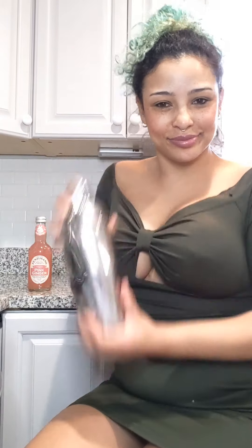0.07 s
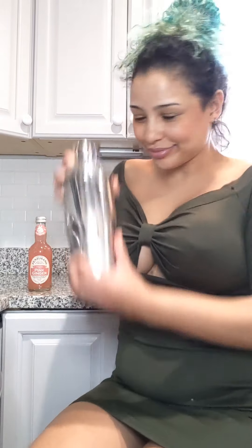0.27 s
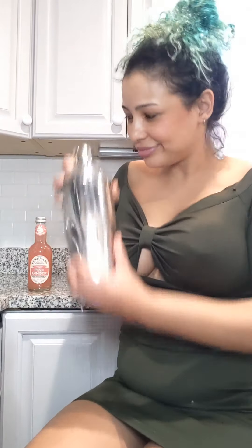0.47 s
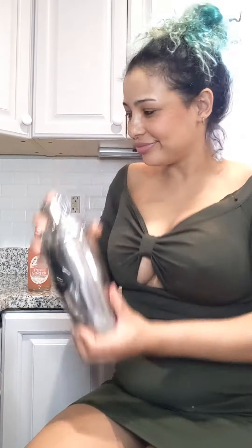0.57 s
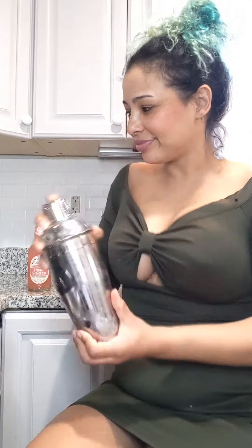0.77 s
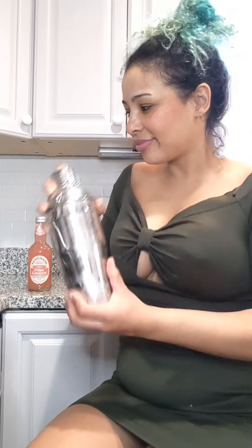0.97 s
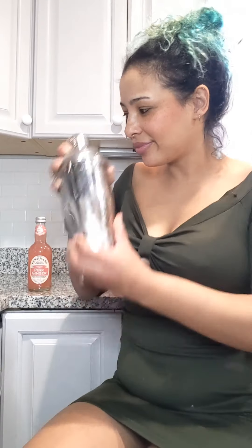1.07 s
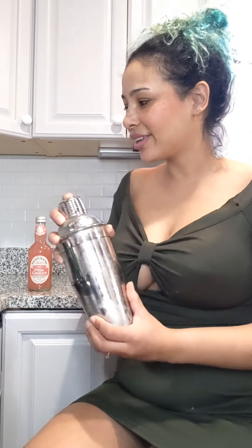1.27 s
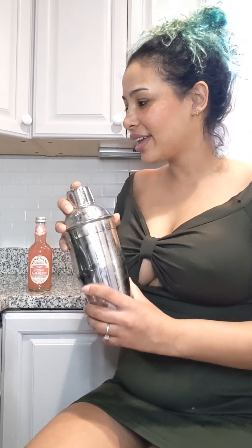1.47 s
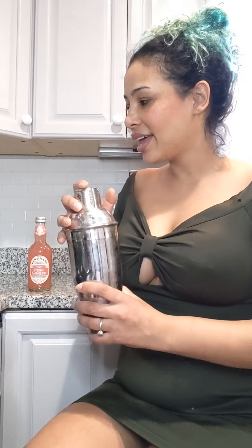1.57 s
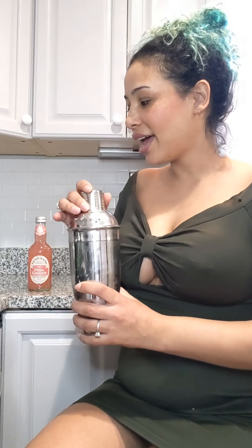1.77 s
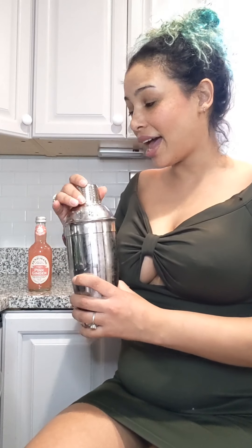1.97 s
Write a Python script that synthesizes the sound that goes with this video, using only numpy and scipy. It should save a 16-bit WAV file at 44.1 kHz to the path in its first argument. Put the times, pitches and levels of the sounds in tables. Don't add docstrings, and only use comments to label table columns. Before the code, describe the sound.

Vigorous cocktail shaking: ice cubes crash against steel in quick strokes, slow down and stop

```python
import sys
import numpy as np
from scipy import signal
from scipy.io import wavfile

SR = 44100
rng = np.random.default_rng(int(sys.argv[2]) if len(sys.argv) > 2 else 0)


def persist_wave(psi):
    counts = np.round(np.clip(psi, -1, 1) * 32767).astype(np.int16)
    wavfile.write(sys.argv[1], SR, np.atleast_2d(counts).T)


def gain_from_decibels(decibels):
    exponent = np.asarray(decibels, float) / 20
    return 10 ** exponent


N = 89170


def rms_one(x):
    return x / np.sqrt(np.mean(x ** 2) + 1e-20)


def at_hz(points, hz):
    table_hz, values = np.transpose(points)
    return np.interp(np.log(hz), np.log(np.maximum(table_hz, 1)), values)


def bandpass(x, edges_hz):
    return signal.sosfilt(signal.butter(2, edges_hz, "band", fs=SR, output="sos"), x)


def ring(clicks, hz, t60_s):
    r = gain_from_decibels(-60 / (t60_s * SR))
    w = 2 * np.pi * hz / SR
    return signal.lfilter([0, np.sin(w)], [1, -2 * r * np.cos(w), r * r], clicks + 1e-18)


# [f/Hz, correlation 0..1]
LIKENESS_BY_HZ = [(40, 1), (90, 0.86), (170, 0.56), (350, 0.67), (700, 1), (1400, 0.11), (2800, 0.11),
                  (6000, .01)]


def stereo(mid, side, hz):
    alike = np.clip(at_hz(LIKENESS_BY_HZ, hz), 0, 1)
    return (np.sqrt(1 + alike) * mid + np.sqrt(1 - alike) * side * [[1], [-1]]) / np.sqrt(2)


def bands(count, gain_at):
    out = 0
    edges_hz = 25 * 2 ** (np.arange(20) / 2)
    white = rng.standard_normal((2, 2, count))
    for k, (low, high) in enumerate(zip(edges_hz, edges_hz[1:])):
        hz = np.sqrt(low * high)
        mid, side = bandpass(white[k % 2], [low, high])
        out = out + gain_at(hz) * stereo(mid, side, hz)
    return out


# [f/Hz, level/dB]
HUM_SPECTRUM = [(76, -36), (130, 2.5), (409, -9.5), (933, -1.5), (1120, -28.5), (2090, -7.5), (2260, -14.5),
                (14700, -26), (15900, -27.5)]
HUM_DB = -62


def hum():
    return gain_from_decibels(HUM_DB) * rms_one(bands(N, lambda hz: gain_from_decibels(at_hz(HUM_SPECTRUM, hz))))


# [t/s, deep level/dB, thump level/dB]
ARM_MOVES = [(0.0, -67, -51), (0.03, -55, -57), (0.11, -69, -54), (0.47, -49.5, -55), (0.62, -60, -63),
             (0.65, -45, -61), (0.75, -50, -50), (0.81, -62.5, -68), (0.89, -53, -52), (1.05, -63, -66),
             (1.14, -65.5, -44.5), (1.27, -63.5, -70), (1.53, -59.5, -73), (1.59, -53, -57),
             (1.66, -58, -66), (2.02, -63.5, -76)]
# [centre f/Hz, width/Hz]
ARM_BANDS = [
    (53, 23),
    (95, 43),
]


def rumble():
    t_s, *levels_db = np.transpose(ARM_MOVES)
    t = np.arange(N) / SR
    out = 0
    for db, (hz, width) in zip(levels_db, ARM_BANDS):
        noise = rng.standard_normal((2, N + SR))
        low = bandpass(noise, [hz - width / 2, hz + width / 2])[:, SR:]
        low = low / (np.abs(signal.hilbert(low)) + 0.26 * low.std())
        out = out + gain_from_decibels(np.interp(t, t_s, db)) * rms_one(stereo(*low, hz))
    return out


# [f/Hz, t60/s]
ROOM_T60 = [(200, 0.49), (700, 0.46), (2000, 0.54), (6000, 0.46), (15000, 0.37)]
ROOM_DB, ROOM_DELAY_S = -4, 0.0025


def kitchen(x):
    t = np.arange(SR) / SR
    tail = bands(SR, lambda hz: gain_from_decibels(-60 * t / at_hz(ROOM_T60, hz)) * (t > ROOM_DELAY_S))
    tail = tail / np.sqrt(np.sum(tail ** 2) / 2)
    return gain_from_decibels(ROOM_DB) * signal.fftconvolve(x[:1], tail, axes=1)[:, :N]


# [start t/s, rise/s, hold/s, level/dB, treble/dB re level]
AVALANCHES = [(-.03, .02, .02, -21, -2), (0.02, 0.031, 0.044, -18, -1), (0.1823, 0.0012, 0.066, -19.5, 1.5),
              (0.25, 0.033, 0.027, -16.5, -1), (0.381, 0.023, 0.045, -19.5, 2),
              (0.477, 0.03, 0.019, -15.5, 0.5), (0.635, 0.0011, 0.028, -23, 1.5),
              (0.667, 0.033, 0.033, -16.5, 0), (0.815, .002, 0.0186, -30, -1),
              (0.842, 0.0021, 0.055, -19.5, -1), (0.902, 0.034, 0.02, -16.5, 0),
              (1.061, 0.004, 0.027, -25, -1), (1.129, 0.029, 0.033, -17, -0.5),
              (1.338, 0.001, 0.01, -30.5, -2.5), (1.364, 0.00092, .025, -29, -3),
              (1.388, 0.005, 0.053, -23, -6.5), (1.698, 0.0039, 0.016, -62, 3),
              (1.803, 0.002, 0.0072, -57.5, 0.5), (1.966, 0.0025, 0.0131, -73.5, 4.5)]
RELEASE_DB_PER_S = 350


def effort():
    t = np.arange(N) / SR
    body, treble = np.zeros(N), np.zeros(N)
    for start, rise, hold, db, treble_db in AVALANCHES:
        attack = np.clip((t - start) / max(rise, 1e-3), 0, 1) ** 2
        fall_db = RELEASE_DB_PER_S * np.maximum(t - start - rise - hold, 0)
        power = attack * gain_from_decibels(2 * db - 2 * fall_db)
        body += power
        treble += power * gain_from_decibels(2 * treble_db)
    return np.sqrt(body), np.sqrt(treble)


SLOSH_HZ, SLOSH_DB, SLOSH_LAG_S = (150, 401), -28.5, 0.0049


def slosh():
    surge = np.interp(np.arange(N) - SLOSH_LAG_S * SR, np.arange(N), effort()[0])
    low = bandpass(rng.standard_normal((2, N)), SLOSH_HZ)
    return gain_from_decibels(SLOSH_DB) * surge * rms_one(stereo(*low, np.mean(SLOSH_HZ)))


# [t/s, peak level/dB, centre f/Hz, t60/s]
SNAPS = [(0.0616, -10, 9500, 0.012), (0.1583, -20, 7400, 0.013), (0.1877, -9.5, 7300, 0.013),
         (0.2177, -15, 8400, 0.012), (0.2532, -26.5, 5400, 0.0094), (0.2713, -23, 5270, 0.012),
         (0.2979, -23, 5420, 0.012), (0.3893, -27, 7080, 0.012), (0.3987, -16, 6450, 0.012),
         (0.4123, -15, 6200, 0.0095), (0.4205, -8.5, 5850, 0.011), (0.4263, -18, 6610, 0.014),
         (0.4335, -16, 6080, 0.012), (0.5106, -11, 5460, 0.014), (0.5162, -13, 7080, 0.0099),
         (0.5244, -8.5, 7190, 0.0094), (0.5494, -11, 5060, 0.012), (0.6416, -20, 7240, 0.017),
         (0.7083, -10, 9400, 0.014), (0.812, -21, 11910, 0.016), (0.8185, -24.5, 11890, 0.012),
         (0.846, -13, 8500, 0.021), (0.8537, -9, 8770, 0.011), (0.8612, -14.5, 6760, 0.0108),
         (0.885, -18, 7360, 0.012), (0.9152, -25, 5360, 0.012), (0.9532, -13, 11560, 0.0092),
         (1.0662, -21.5, 7660, 0.013), (1.076, -28, 6160, 0.0096), (1.1417, -10, 7200, 0.0095),
         (1.165, -18.5, 5800, 0.012), (1.182, -10, 8500, 0.0138), (1.2932, -24.5, 5160, 0.015),
         (1.4027, -24.5, 9100, 0.012), (1.4203, -25, 6540, 0.0085), (1.4443, -19.5, 9900, 0.014),
         (1.705, -58, 8650, 0.012), (1.8069, -49.5, 7390, 0.012), (1.8448, -53, 7150, 0.0135),
         (1.9768, -60, 9010, 0.0141)]
SNAP_HALF_WIDTH, SNAP_RISE_S = 0.25, 0.00034


def snaps():
    count = SR // 16
    out = np.zeros((2, N))
    t = np.arange(count) / SR
    noises = rng.standard_normal((len(SNAPS), 2, count))
    for (start, db, hz, t60), noise in zip(SNAPS, noises):
        grain = rms_one(bandpass(noise, [hz * (1 - SNAP_HALF_WIDTH), hz * (1 + SNAP_HALF_WIDTH)]))
        burst = grain * (1 - np.exp(-t / SNAP_RISE_S)) * gain_from_decibels(db - 60 * t / t60)
        i = int(start * SR)
        out[:, i:i + count] += burst[:, :N - i]
    return out


CHIP_SPREAD_DB, TREBLE_FROM_HZ = 2.5, 4500


def contacts(per_s, pitches_hz, gains, t60s):
    low, high = np.zeros((2, N)), np.zeros((2, N))
    for hz, gain, t60 in zip(pitches_hz, gains, t60s):
        struck = rng.random(N) < per_s * np.sqrt(hz / 1000) / SR
        size = gain_from_decibels(CHIP_SPREAD_DB * np.minimum(rng.exponential(1, N), 4))
        mid, side = struck * size * rng.standard_normal((2, N))
        rung = ring(stereo(mid, side, hz), hz, t60)
        part = high if hz > TREBLE_FROM_HZ else low
        part += gain * rms_one(np.gradient(rung, axis=1))
    total = np.sqrt(np.mean((low + high) ** 2))
    return low / total, high / total


# [f/Hz, density level/dB per Hz]
CHIP_SPECTRUM = [(387, -18.5), (850, -5.5), (1230, -7), (1900, 4), (5000, -5.5), (7500, -6), (14000, -12),
                 (15900, -10.5)]
# [f/Hz, level/dB, t60/s]
SHELL_MODES = [(870, -5.5, 0.042), (1015, 0, 0.027), (1336, -7, 0.014), (1627, 6, 0.053),
               (1881, 5.5, 0.081), (2110, -17, 0.027), (2194, 1.5, 0.093), (2450, 2, 0.032),
               (2362, -4, 0.019), (2537, 0.5, 0.1), (2685, -13.5, .04), (2970, -3.5, 0.023),
               (3155, 0, 0.071), (3570, 1, 0.01)]
CHIPS_PER_S, CHIP_CYCLES = 500, 9
SHELL_DB, SHELL_HITS_PER_S = -6.5, 150
LID_HZ, LID_DB = (5940, 9300), -0.5
BASE_BELOW_HZ, BASE_SHARE = 1200, 0.8


def rattle():
    body, treble = effort()
    pitches = np.geomspace(250, 15800, 36)
    gains = gain_from_decibels(at_hz(CHIP_SPECTRUM, pitches)) * np.sqrt(pitches)
    low, high = contacts(CHIPS_PER_S, pitches, gains, CHIP_CYCLES / pitches)
    hz, db, t60 = np.transpose(SHELL_MODES)
    shell = contacts(SHELL_HITS_PER_S, hz, gain_from_decibels(db), t60)[0]
    bright = np.maximum(treble / (body + 1e-12) - 1, 0)
    lid = bandpass(high, LID_HZ) * gain_from_decibels(LID_DB) * bright
    base = signal.sosfiltfilt(signal.butter(2, BASE_BELOW_HZ, fs=SR, output="sos"), low)
    base = base * np.minimum(BASE_SHARE * bright, 1)
    return body * (low - base + gain_from_decibels(SHELL_DB) * shell) + treble * (high + lid)


# [t/s, peak level/dB, pitch f/Hz, t60/s]
SHELL_KNOCKS = [(0.0393, -16, 1960, 0.0129), (0.0462, -16, 1850, 0.0096), (0.0626, -17, 2270, 0.0093),
                (0.0746, -25, 2560, 0.0136), (0.0811, -18, 2360, 0.022), (0.135, -15.5, 2430, 0.018),
                (0.1916, -13.5, 1546, 0.017), (0.2532, -17, 3220, 0.025), (0.2904, -6, 2450, 0.032),
                (0.2982, -9.5, 2504, 0.017), (0.3247, -19, 2330, 0.02), (0.3419, -14, 2220, 0.017),
                (0.3629, -15, 2650, 0.02), (0.4009, -20, 1680, 0.018), (0.4192, -21, 1810, 0.02),
                (0.4401, -12, 2400, 0.02), (0.496, -13.5, 1984, 0.04), (0.5047, -8, 1552, 0.019),
                (0.5241, -9, 1810, 0.015), (0.5662, -20, 2220, 0.025), (0.642, -16, 1972, 0.034),
                (0.6905, -16, 3540, 0.02), (0.7306, -13, 2580, 0.021), (0.8169, -17, 1725, 0.016),
                (0.8469, -22, 1610, 0.025), (0.8816, -13, 1625, 0.015), (0.9254, -11, 2000, 0.018),
                (0.9399, -13, 1340, 0.029), (0.9464, -9, 2020, 0.018), (0.953, -20.5, 2770, 0.023),
                (1.0756, -7.5, 1877, 0.019), (1.0841, -12, 1930, 0.0088), (1.1374, -8.5, 1674, 0.02),
                (1.1454, -2.5, 2489, 0.0089), (1.2105, -11, 2394, 0.017), (1.3399, -24, 1670, 0.015),
                (1.3483, -25.5, 1860, 0.025), (1.3685, -21, 2034, 0.025), (1.3929, -15.5, 1637, 0.022),
                (1.4043, -12.5, 1703, 0.018), (1.4545, -25.5, 2440, 0.0176), (1.5126, -24.5, 1950, 0.011),
                (1.545, -28.5, 1683, 0.02), (1.8062, -52, 2420, 0.022), (1.825, -46, 1834, 0.024),
                (1.845, -35.5, 1690, 0.013), (1.972, -66, 1709, 0.025), (2.0138, -37, 1690, 0.02)]
# [t/s, peak level/dB, pitch f/Hz, t60/s]
FURTHER_KNOCKS = [(.039, -14.5, 906, 0.016), (.073, -17, 958, .025), (.186, -9, 1550, 0.0079),
                  (.5105, -5.5, 2500, 0.016), (.6402, -7.5, 1957, .012), (.7095, -13, 2170, 0.0081),
                  (.716, -18, 646, 0.028), (.855, -16, 3150, 0.037), (1.067, -19, 1550, 0.014),
                  (1.073, -24.5, 3160, 0.019), (1.135, -6.5, 1570, .01), (1.16, -13.5, 2352, .03),
                  (1.3635, -17.5, 1950, 0.017), (1.3925, -22, 603, 0.029), (1.68, -42.5, 3820, .015),
                  (1.805, -54, 4020, .015), (1.823, -50, 804, 0.038), (1.8455, -46.5, 2440, .012),
                  (2.0135, -43, 3800, 0.017), (2.014, -49, 817, .02)]
# [ratio to pitch, level/dB, share of t60]
PARTIALS = [(0.449, -17.5, 2.73), (.86, -8, 1.13), (1.001, 0.5, 1.97), (1.169, -13.5, 2.8),
            (1.679, 1, 0.35), (2.1, -11, 1.4)]
KNOCK_DB, KNOCK_RISE_S = -3.5, 0.00059
CRACK_DB, CRACK_T60_S, CRACK_HZ = -2.5, 0.013, (1110, 4950)


def knocks(hits):
    count = SR // 16
    out = np.zeros((2, N))
    t = np.arange(count) / SR
    chance = rng.standard_normal((len(hits), 2 + len(PARTIALS)))
    cracks = rng.standard_normal((len(hits), 2, count))
    for (start, db, hz, t60), (pan_db, lag, *luck), noise in zip(hits, chance, cracks):
        tone = 0
        for (ratio, partial_db, share), u in zip(PARTIALS, luck):
            decay = gain_from_decibels(partial_db + 2 * u - 60 * t / (t60 * share))
            tone = tone + decay * np.sin(2 * np.pi * hz * ratio * t)
        crack = bandpass(gain_from_decibels(CRACK_DB - 60 * t / CRACK_T60_S) * noise, CRACK_HZ)
        sound = gain_from_decibels(db + KNOCK_DB) * (1 - np.exp(-t / KNOCK_RISE_S)) * (tone + crack)
        for side in range(2):
            i = int(start * SR) + side * int(lag)
            out[side, i:i + count] += gain_from_decibels(pan_db * (side - 0.5)) * sound[side, :N - i]
    return out


BODY_FROM_HZ, KNOCK_ROOM_DB, LEFT_DB = 242, -3.5, 0.4


def scene():
    highpass = signal.butter(3, BODY_FROM_HZ, "high", fs=SR, output="sos")
    ice = signal.sosfilt(highpass, rattle())
    hits = signal.sosfilt(highpass, knocks(SHELL_KNOCKS))
    background = hum() + rumble()
    ice = ice + snaps() + slosh()
    hits = hits + knocks(FURTHER_KNOCKS)
    room = kitchen(ice + gain_from_decibels(KNOCK_ROOM_DB) * hits)
    return (ice + hits + room + background) * gain_from_decibels(LEFT_DB * np.array([[1], [-1]]))


def roll_off(x):
    return signal.sosfilt(signal.butter(12, 16050, fs=SR, output="sos"), x)


def record(dry):
    held = np.clip(dry, -1, 1)
    mix = signal.sosfilt(signal.ellip(12, 0.5, 60, 15960, fs=SR, output="sos"), held)
    return roll_off(mix)


dry = scene()
out = record(dry)
persist_wave(out)
```